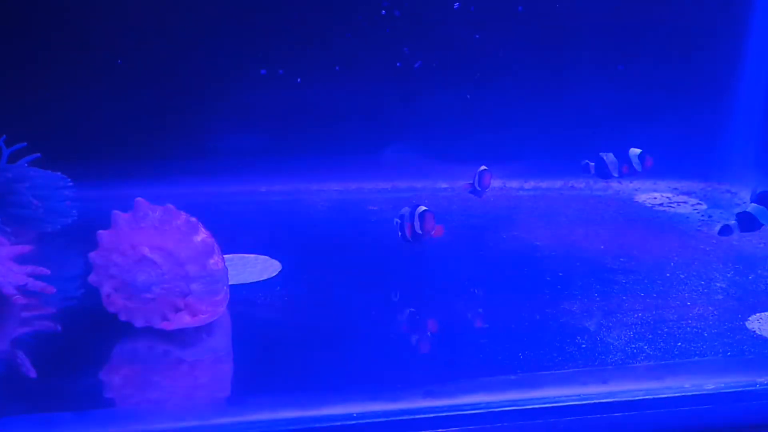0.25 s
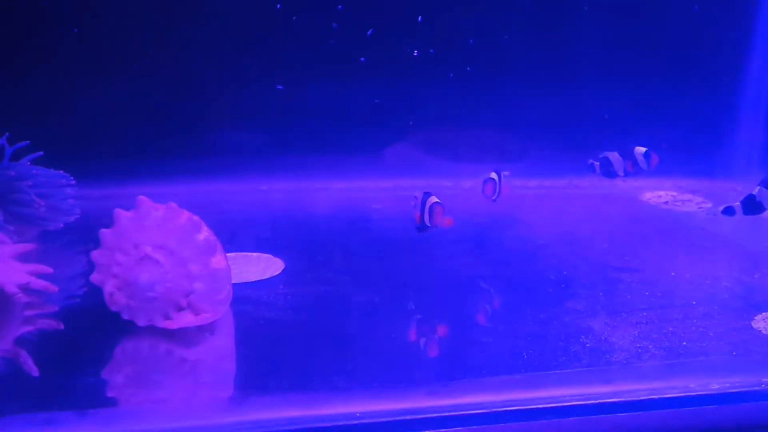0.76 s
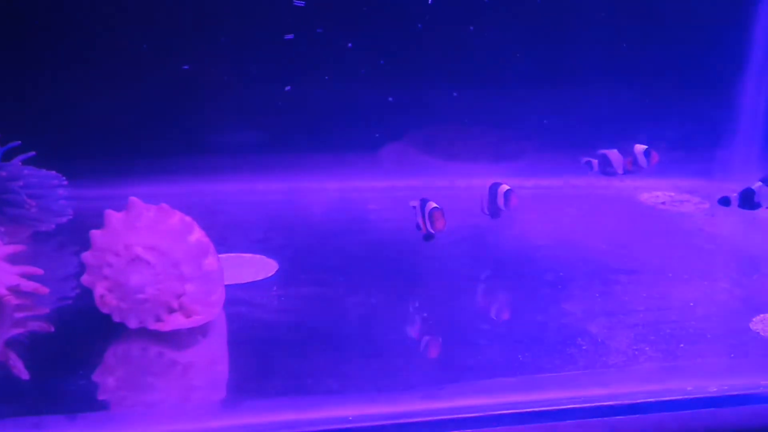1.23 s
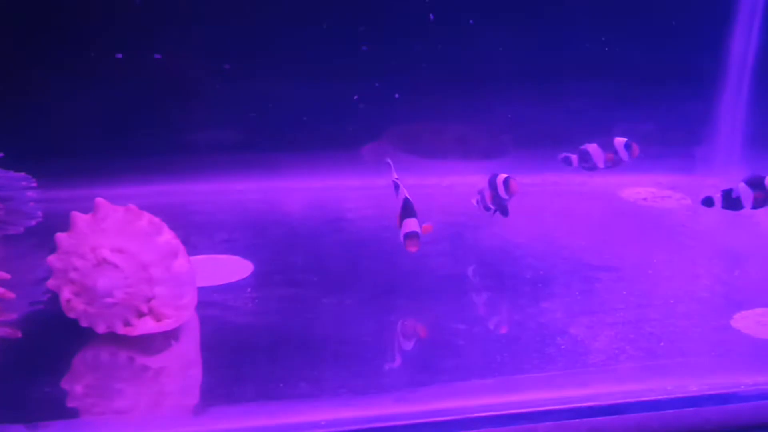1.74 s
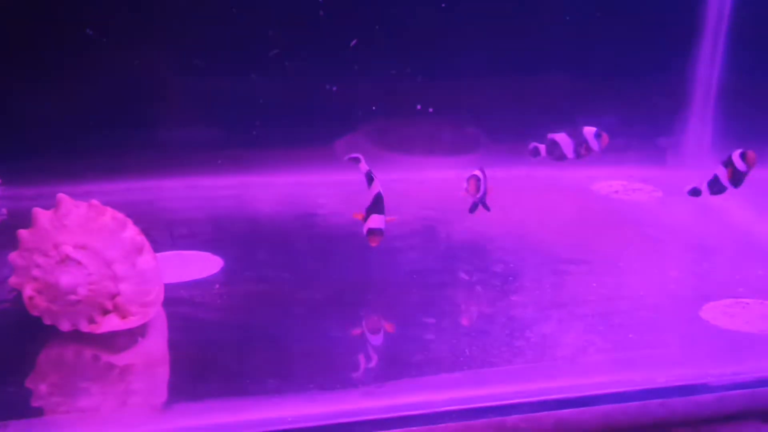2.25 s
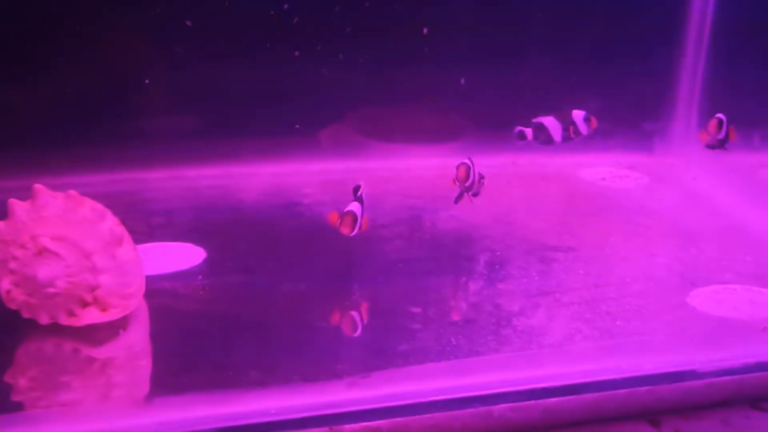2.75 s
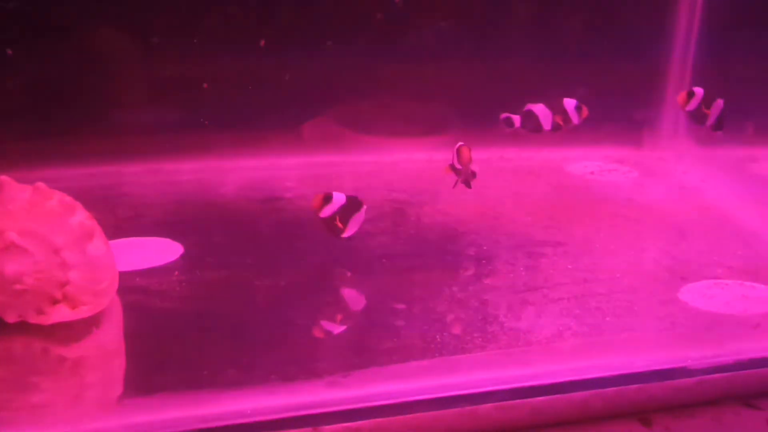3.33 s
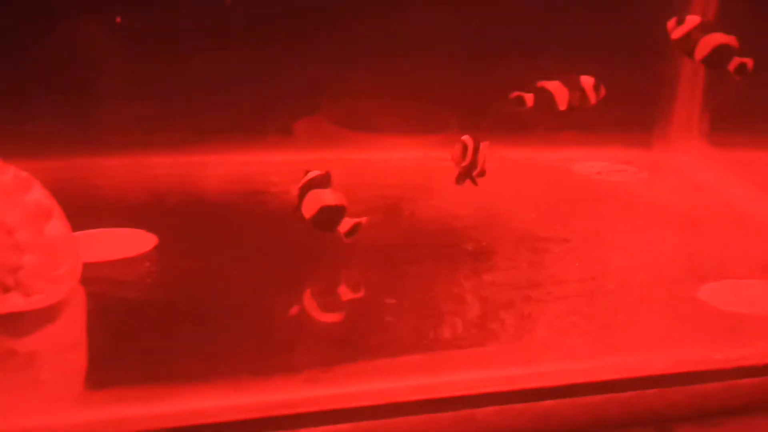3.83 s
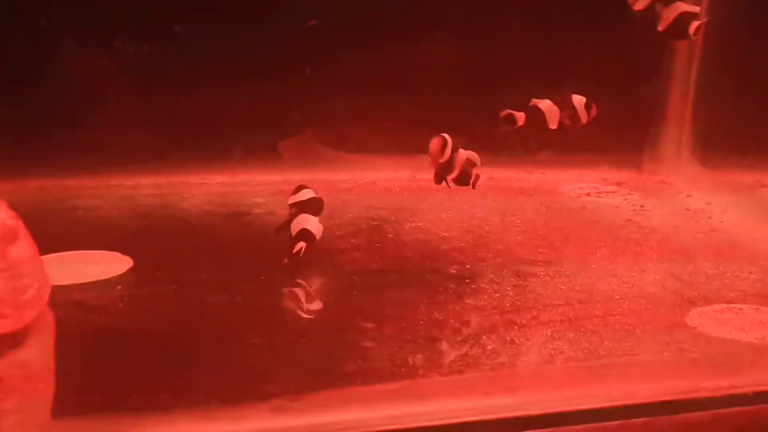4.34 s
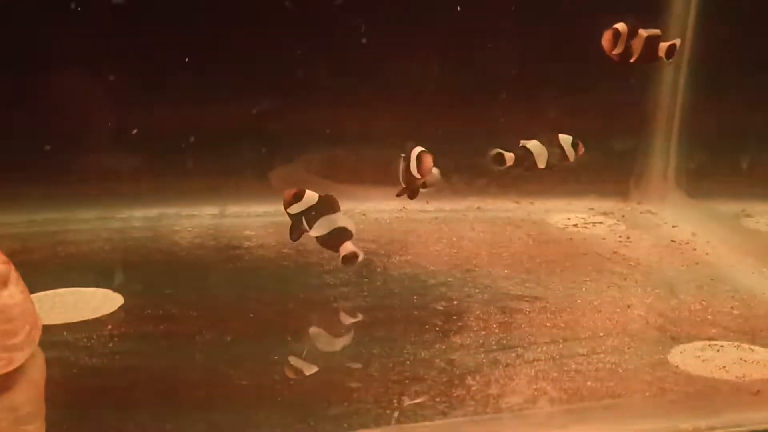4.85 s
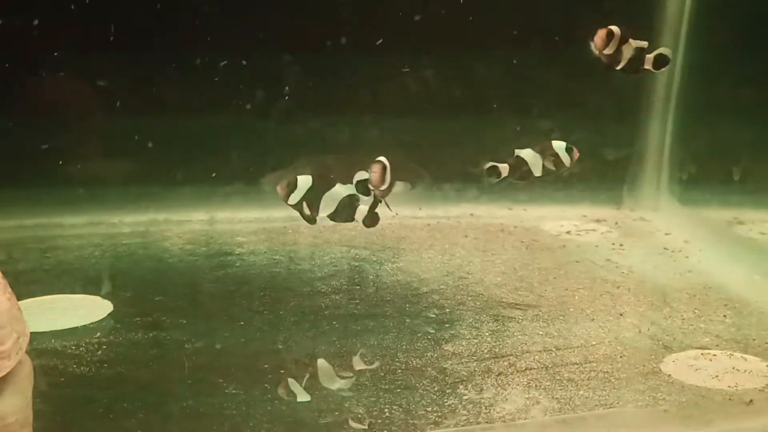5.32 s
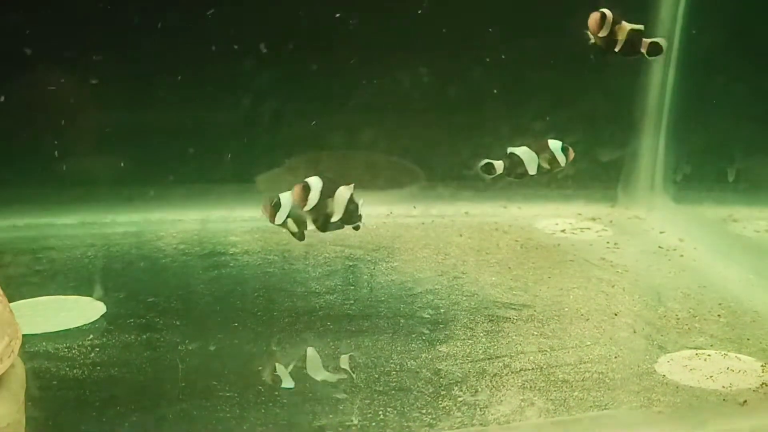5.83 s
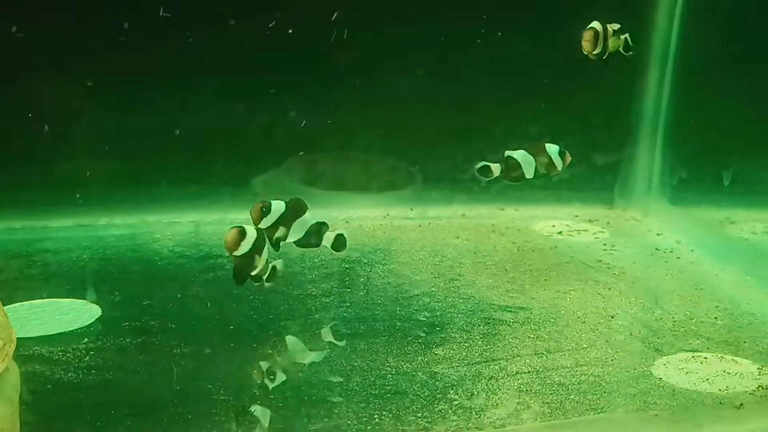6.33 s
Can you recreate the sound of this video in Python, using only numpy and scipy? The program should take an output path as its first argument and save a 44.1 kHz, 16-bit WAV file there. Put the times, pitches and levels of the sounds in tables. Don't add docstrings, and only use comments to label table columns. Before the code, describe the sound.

A running aquarium in a quiet room, heard close in mono for about 6.6 seconds. From 0 s a deep steady pump hum, a rougher rotor buzz and a hollow cabinet drone sit under a broad rush of circulating water, a little louder for the first quarter second. Fine fizz and dense trickling fill the treble, and a thin high whine flutters about nine or ten times a second, its throbs swelling and receding. From about 0.15 s small bubbles ring and plink at irregular moments, mixed with light spray and popping drops. The sharpest snap comes at 1.1 s. From 1.5 s another low motor tone fades gently into the hum. Rounder, clearer bubbles ring near 2.15, 2.4, 4.9 and 5.1 s. At about 6.35 s a brighter flurry of spray breaks the surface, and the steady hum and water continue to the end. Glass and walls add short reflections.

```python
import sys
import numpy as np
from scipy import signal
from scipy.fft import rfft, irfft
from scipy.io import wavfile
from scipy.ndimage import uniform_filter1d

SR = 44100
rng = np.random.default_rng(int(sys.argv[2]) if len(sys.argv) > 2 else 0)


def generate_wav(signal):
    frames = np.transpose(np.atleast_2d(signal))
    scaled = np.clip(frames, -1, 1) * 32767
    pcm = np.round(scaled).astype(np.int16)
    wavfile.write(sys.argv[1], SR, pcm)


def field_ratio(decibels):
    return 10 ** (np.asarray(decibels, dtype=float) / 20)


N = 290178


def evened(x):
    return x / np.sqrt(np.mean(x ** 2) + 1e-20)


def read(points, hz):
    f, value = np.transpose(points)
    return np.interp(np.log(hz + 1), np.log(f + 1), value)


def along(rows):
    s, *columns = np.transpose(rows)
    return [np.interp(np.arange(N) / SR, s, column) for column in columns]


def add(mix, s, sound):
    part = mix[max(round(s * SR), 0):][:len(sound)]
    part += sound[:len(part)]


def coloured(x, colour):
    hz = np.fft.rfftfreq(len(x), 1 / SR)
    return irfft(rfft(x) * field_ratio(read(colour, hz)), len(x))


def noise(colour, patchy_db, shared_db, size=512):
    frames, hz = 4 * N // size + 5, np.fft.rfftfreq(size, 1 / SR)
    real, imaginary, patches = rng.standard_normal((frames, len(hz), 3)).T
    patches = uniform_filter1d(patches, size=6, axis=0)
    patches = evened(uniform_filter1d(patches, size=14, axis=1))
    flicker = evened(uniform_filter1d(rng.standard_normal(frames), size=10))
    level_db = read(colour, hz)[:, None] + patchy_db * patches + shared_db * flicker
    spectra = (real + 1j * imaginary) * field_ratio(level_db)
    return evened(signal.istft(spectra, nperseg=size, noverlap=3 * size // 4)[1][:N])


def resonate(x, hz, width_hz):
    turn = np.exp(2j * np.pi * hz * np.arange(len(x)) / SR)
    r = np.exp(-np.pi * width_hz / SR)
    low = signal.lfilter([1 - r], [1, -r], x / turn)
    low = signal.lfilter([1 - r], [1, -r], low)
    return 2 * (turn * low).real


def tones(hz, level_db, lag_s, scatter):
    panel_hz, panel_width_hz, panel_turns = 188.4, 8, .12
    t, out = np.arange(N) / SR, np.zeros(N)
    for f, db, chance in zip(hz, level_db, rng.standard_normal(len(hz))):
        below = (panel_hz - f) / panel_width_hz
        turns = f * (t - lag_s) + panel_turns * 2 * below / (1 + below ** 2)
        path_phase = scatter * chance * (f / 500) ** 2
        out -= np.sqrt(2) * field_ratio(db) * np.sin(2 * np.pi * turns + path_phase)
    return out


def opening():
    settle_s = 0.27
    return field_ratio(5.5 * np.exp(-np.arange(N) / SR / settle_s))


# (multiple of mains pitch, level [dB])
PUMP_ORDERS = [(1, -64.0), (2, -55.0), (3, -51), (4, -42.5), (5, -59.5), (6, -64.5), (8, -80), (10, -117),
               (11, -95.5), (12, -66.5), (14, -79.5), (16, -81), (17, -88), (18, -83), (20, -102),
               (21, -88), (23, -93)]
# (multiple of rotor pitch, level [dB])
ROTOR_ORDERS = [(3, -60), (4, -70), (6, -70.5), (8, -74.5), (10, -71.5), (11, -73.5), (12, -70.5),
                (13, -71), (14, -69.5), (15, -77), (16, -68.5), (17, -67), (18, -87.5), (20, -94),
                (21, -77), (24, -87), (25, -88), (29, -74), (32, -83), (33, -76.5), (36, -79.5), (37, -86),
                (40, -74.5), (41, -98), (42, -72.5), (43, -81.5), (47, -86), (48, -78.5), (52, -78),
                (53, -113.5)]
# (pitch [Hz], level [dB], lag [s])
LONE_SHAFTS = [
    (58.42, -71, .00995),
    (144.68, -65, .0002),
]


def motors():
    mains_hz, rotor_hz, late_start_s = 60.134, 47.914, 1.5
    orders, level_db = np.transpose(PUMP_ORDERS)
    hum = tones(mains_hz * np.round(orders), level_db, lag_s=.0016, scatter=.12)
    orders, level_db = np.transpose(ROTOR_ORDERS)
    buzz = tones(rotor_hz * np.round(orders), level_db, lag_s=.0033, scatter=0.794)
    first, second = (tones([hz], [db], lag_s, 0) for hz, db, lag_s in LONE_SHAFTS)
    late_fade = np.clip(np.arange(N) / SR - late_start_s, 0, 1)
    return hum + buzz + first + second * late_fade


# (frequency [Hz], density [dB per Hz])
RUMBLE_COLOUR = [(30, -43), (48, -13), (75, -13.5), (135, -5), (160, -11), (220, -2.5), (320, -8),
                 (400, -8), (470, -12), (590, -17.5), (760, -8.5), (900, -16), (1050, -17.5), (1500, -40.5)]


def rumble():
    return field_ratio(-55) * opening() * noise(RUMBLE_COLOUR, patchy_db=1.5, shared_db=0.2, size=4096)


# (frequency [Hz], width [Hz], level [dB])
CABINET_MODES = [(108.6, 5.8, -70), (130.5, 4, -80), (186.2, 27, -60), (275.7, 21, -65.5), (414, 56, -67.5),
                 (685.3, 73, -61), (854.6, 28, -69), (1455, 117, -70.5), (2104, 170, -74), (3730, 150, -74),
                 (4790, 240, -77)]


def cabinet():
    wander_db, wander_s = .6, .15
    span = round(wander_s * SR)
    wander = uniform_filter1d(rng.standard_normal(N), span)
    wander = evened(uniform_filter1d(wander, span))
    shaking = rng.standard_normal(N) * field_ratio(wander_db * wander) * opening()
    return sum(field_ratio(db) * evened(resonate(shaking, hz, width_hz)) for hz, width_hz, db in CABINET_MODES)


# (time [s], effort [dB])
STIR_EFFORT = [(0.0, -61), (0.05, -59.5), (1.7, -58.5), (1.72, -58), (2.14, -59.5), (2.2, -57.5),
               (2.58, -60.5), (2.64, -57.5), (3.76, -59.5), (4.31, -58), (5.42, -59), (5.86, -58),
               (5.97, -59), (6.58, -59.5)]


def stirred(level_db, share):
    effort_db = along(STIR_EFFORT)[0]
    return field_ratio(level_db + share * (effort_db - effort_db.mean()))


# (frequency [Hz], density [dB per Hz])
RUSH_COLOUR = [(850, -48), (1230, 2.5), (1440, 0), (1650, 3.5), (2030, 2.5), (2350, 0), (3000, 0.5),
               (3500, -1), (4300, 1.5), (4950, -2.5), (5600, -10.5), (6400, -3), (7500, -15), (9000, -37)]
# (frequency [Hz], density [dB per Hz])
FIZZ_COLOUR = [(6300, -40), (7600, 12), (8400, 4), (9000, -1), (10000, -6), (12700, -4.5), (13500, 3),
               (14500, 4.5), (15600, 4)]


def flow():
    rush = noise(RUSH_COLOUR, patchy_db=.8, shared_db=.6)
    fizz = noise(FIZZ_COLOUR, patchy_db=.5, shared_db=1.5)
    return stirred(-60, share=1) * rush * opening() + stirred(-59, share=0.5) * fizz


def trickle():
    per_s = 900
    t, out = np.arange(400) / SR, np.zeros(N)
    sizes = field_ratio(4.2 * np.minimum(rng.exponential(1, N), 4))
    sizes = sizes * (rng.random(N) < per_s / SR)
    kind = rng.integers(0, 16, N)
    for k, hz in enumerate(np.geomspace(2500, 5600, num=16)):
        onset = 1 - np.exp(-t / 0.0004)
        ring = np.exp(-t * hz / 3.9) * np.sin(2 * np.pi * hz * t) * onset
        out += signal.oaconvolve(sizes * (kind == k), ring)[:N] * (hz / 4000) ** 1.45
    return stirred(-67.5, share=2.9) * evened(out)


def throbbing(rows, hz, width_hz, per_s):
    level_db, lead = along(rows)
    turn = (per_s * np.arange(N) / SR + lead + 0.21) % 1
    swell = evened(turn / .09 * np.exp(-turn / .09) + .04)
    return field_ratio(level_db) * swell * evened(resonate(rng.standard_normal(N), hz, width_hz))


# (time [s], level [dB])
STEADY_WHINE = [
    (0.0, -56.5),
    (6.58, -54.5),
]
# (time [s], level [dB], lead [turns of the throb])
UPPER_THROB = [
    (0, -64, 0.73),
    (1.3, -67, 0.72),
    (1.9, -66, 0.42),
    (2.5, -58.5, 0.53),
    (3.3, -60, 0.2),
    (4.2, -61, 0.5),
    (5.1, -63, 0.61),
    (6, -60.5, 0.57),
    (6.58, -64, 0.76),
]
# (time [s], level [dB], lead [turns of the throb])
LOWER_THROB = [
    (0, -64, 0.13),
    (1.1, -62.5, 0.2),
    (1.9, -60, 0.24),
    (2.7, -64, 0.099),
    (3.1, -65, 0.05),
    (3.7, -60, 0.056),
    (4.4, -59.5, 0.13),
    (5.6, -60.5, 0.24),
    (6.58, -61.5, 0.28),
]


def whine():
    steady = field_ratio(along(STEADY_WHINE)[0]) * evened(resonate(rng.standard_normal(N), 7180, 570))
    upper = throbbing(UPPER_THROB, hz=7340, width_hz=350, per_s=8.85)
    lower = throbbing(LOWER_THROB, hz=7020, width_hz=480, per_s=10.1)
    return coloured(steady + upper + lower, [(6300, -7.5), (6750, 0.5), (9000, 1.5)])


def splashes(rows, colour, burst_s, tick_db, gain_db):
    t, shape, ticks = np.arange(3000) / SR, np.zeros(N), np.zeros(N)
    for s, db in rows:
        add(shape, s, field_ratio(db) * np.exp(-t / burst_s))
        add(ticks, s, field_ratio([db + tick_db]))
    white = rng.standard_normal(N)
    loss = np.std(coloured(white, colour))
    return field_ratio(gain_db) * coloured(shape * white + ticks, colour) / loss


# (time [s], level [dB])
SPRAY_BURSTS = [(0.132, -64), (0.433, -60), (0.625, -66), (1.007, -67), (1.44, -64), (1.614, -70),
                (1.725, -61), (2.425, -64), (2.752, -61), (2.832, -69), (2.99, -69), (3.289, -61),
                (3.992, -58), (4.343, -66), (4.427, -61), (4.633, -61), (4.834, -59), (4.996, -61),
                (5.066, -59), (5.495, -64), (5.563, -65), (5.732, -58), (5.856, -63), (6.03, -63),
                (6.303, -64), (6.346, -51), (6.365, -57), (6.389, -61), (6.42, -63), (6.57, -65)]
# (frequency [Hz], level [dB])
SPRAY_SPECTRUM = [(6500, -24), (8500, -14), (11000, -14), (12600, -11), (13200, -1), (15300, 1.5),
                  (17000, -9)]


def spray():
    return splashes(SPRAY_BURSTS, SPRAY_SPECTRUM, burst_s=.016, tick_db=6, gain_db=-4.5)


# (time [s], pitch [Hz], level [dB], fade [cycles])
CLEAR_BUBBLES = [(0.195, 2760, -59, 10), (0.313, 5050, -56.5, 6.3), (0.575, 4850, -64, 13),
                 (0.625, 4350, -61, 13), (0.845, 1540, -60, 11), (1.22, 3680, -61, 10),
                 (1.297, 2830, -57, 12), (1.72, 4500, -55, 14), (1.79, 4140, -58, 13),
                 (1.973, 3420, -58.5, 10), (2.151, 1580, -52.5, 17), (2.417, 1925, -51, 11),
                 (2.62, 2720, -55, 28), (2.694, 3680, -56, 9.3), (2.87, 2340, -60, 12),
                 (2.907, 1420, -59, 13), (2.964, 3540, -60, 10), (3.018, 4370, -58, 10),
                 (3.413, 3020, -57, 6.3), (3.651, 3260, -64, 10), (4.051, 3780, -57.5, 11),
                 (4.279, 3750, -58.5, 9), (4.804, 3830, -62, 6), (4.912, 3030, -53.5, 6.8),
                 (5.077, 2525, -55, 29), (5.225, 3130, -58.5, 12), (5.44, 2510, -61, 20),
                 (5.805, 4550, -59, 10), (5.85, 2950, -64, 20), (6.409, 4460, -58, 13)]
# (time [s], pitch [Hz], level [dB])
QUICK_PLINKS = [(0.426, 5680, -63), (0.443, 4940, -65), (0.617, 5090, -66), (0.937, 4730, -59),
                (0.988, 5250, -63), (1.719, 5230, -63), (1.805, 5370, -68), (2.179, 2730, -62),
                (2.321, 4750, -59), (2.495, 5600, -58), (2.511, 2900, -64), (2.905, 5060, -59),
                (2.954, 5230, -66), (3.104, 4200, -71), (3.213, 4100, -61), (3.649, 4330, -62),
                (3.847, 4580, -62), (4.216, 4500, -59), (4.264, 2670, -71), (4.385, 5210, -66),
                (4.668, 5260, -63), (5.275, 5430, -65), (5.318, 4780, -62), (5.562, 3940, -59.5),
                (5.594, 5170, -62), (5.788, 5300, -62), (5.807, 3060, -64), (5.861, 5780, -66),
                (5.89, 3000, -65)]


def bubbles():
    steady_hz, sag_per_khz = 1500, .022
    plink_cycles, plink_lift_db = 6, 2.5
    out, t = np.zeros(N), np.arange(4000) / SR
    plinks = [(s, hz, db + plink_lift_db, plink_cycles) for s, hz, db in QUICK_PLINKS]
    rows = [*CLEAR_BUBBLES, *plinks]
    for (s, hz, db, cycles), white in zip(rows, rng.standard_normal((len(rows), 4000))):
        cycles = max(cycles, 3)
        age = t * hz / cycles
        sag = sag_per_khz * max(hz - steady_hz, 0) / 1000
        pitch = hz * (1 - sag * (np.minimum(age, 2) - .5))
        fade = np.exp(-age) * np.sqrt(hz / cycles / 250)
        ring = fade * np.sin(2 * np.pi * np.cumsum(pitch) / SR)
        cloud = 1.1 / cycles * np.exp(-t / 0.03) * evened(resonate(white, hz, hz / cycles))
        onset = 1 - np.exp(-t / 0.00033)
        add(out, s, field_ratio(db + 10.5) * (ring + cloud) * onset)
    return out


# (time [s], level [dB])
DROP_POPS = [(0.199, -61), (1.108, -43.5), (1.422, -58), (1.719, -62), (2.251, -63), (2.401, -62),
             (2.506, -62), (2.758, -65), (2.829, -63), (2.9, -71), (3.131, -64), (3.351, -62), (3.847, -69),
             (3.954, -59), (4.104, -63), (4.281, -71), (4.335, -61), (4.719, -62), (5.068, -67),
             (5.537, -63), (5.588, -63), (5.727, -62), (5.947, -65), (6.027, -60), (6.136, -61),
             (6.344, -60), (6.488, -62)]
# (frequency [Hz], level [dB])
POP_SPECTRUM = [(6000, -37), (7000, -2), (7600, 4), (8900, 6), (9300, -14), (9800, -23), (11000, -32)]


def pops():
    return splashes(DROP_POPS, POP_SPECTRUM, burst_s=0.002, tick_db=23, gain_db=0.5)


# (delay [s], level [dB])
EARLY_ECHOES = [(.0032, -3), (.0072, -3), (.0098, -3), (0.0133, -5), (0.02, -11)]


def echoes(x, loss_db):
    out = x.copy()
    for (delay_s, db), sign in zip(EARLY_ECHOES, rng.choice([-1., 1.], len(EARLY_ECHOES))):
        add(out, delay_s, sign * field_ratio(db - loss_db) * x)
    return out


# (frequency [Hz], 60 dB decay time [s])
ROOM_DECAY = [(1000, 0.16), (4000, 0.56), (8000, 0.5), (15000, 0.029)]


def room(x):
    taps = np.zeros(SR // 2)
    at = np.arange(200, SR // 2 - 20, 20)
    taps[at + rng.integers(0, 20, len(at))] = rng.choice([-1., 1.], len(at))
    hz, t, z = signal.stft(taps, SR, nperseg=256)
    decay = field_ratio(-60 * t / read(ROOM_DECAY, hz)[:, None])
    tail = signal.istft(z * decay, SR, nperseg=256)[1]
    return signal.fftconvolve(x, tail / np.linalg.norm(tail))[:N]


def scene():
    machine = motors() + rumble() + cabinet()
    water, high = flow(), whine()
    bursts = field_ratio(6.5) * spray() + pops()
    rings = bubbles() + trickle()
    steady = field_ratio(-17) * (water + high)
    near = echoes(bursts, loss_db=0) + echoes(rings, loss_db=6)
    wet = room(bursts + field_ratio(-3) * rings + steady)
    mix = machine + water + field_ratio(1.0) * high + near + wet
    return np.array([mix, mix])


# (time [s], low edge [Hz], high edge [Hz], level [dB])
CHANNEL_SPLITS = [
    (2.001, 6230, 7700, -60),
    (2.001, 13000, 14600, -75),
    (4.230, 6760, 8300, -57),
    (4.230, 4600, 6300, -66),
    (4.230, 13700, 15400, -66),
]


def channel_difference():
    side, hz = np.zeros(N), np.fft.rfftfreq(2048, 1 / SR)
    for s, low_hz, high_hz, db in CHANNEL_SPLITS:
        band = irfft(rfft(rng.standard_normal(2048)) * (hz > low_hz) * (hz < high_hz))
        add(side, s, field_ratio(db) * evened(band) * signal.windows.tukey(2048, .6))
    return np.array([side, -side])


def low_pass(x):
    return signal.sosfilt(signal.butter(12, 16610, fs=SR, output="sos"), x)


def record(dry):
    edge_hz = 15490
    edge = signal.firwin(1023, edge_hz, window=("kaiser", 9), fs=SR)
    limited = signal.oaconvolve(dry + channel_difference(), edge[None], "same")
    return low_pass(limited)


dry = scene()
out = record(dry)
generate_wav(out)
```